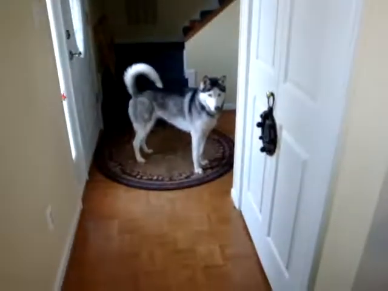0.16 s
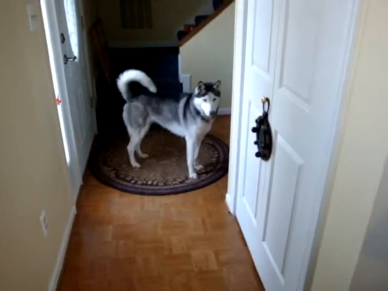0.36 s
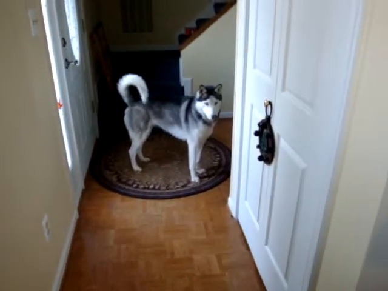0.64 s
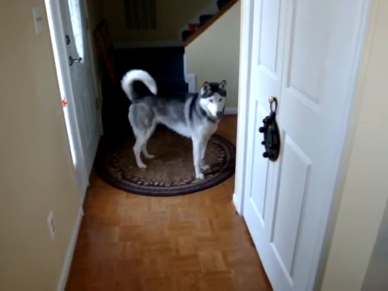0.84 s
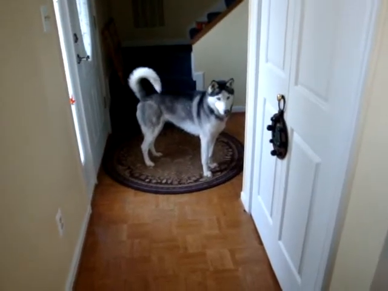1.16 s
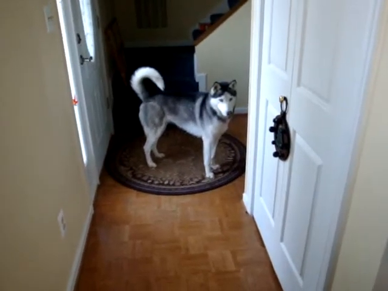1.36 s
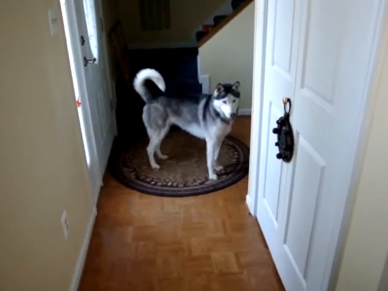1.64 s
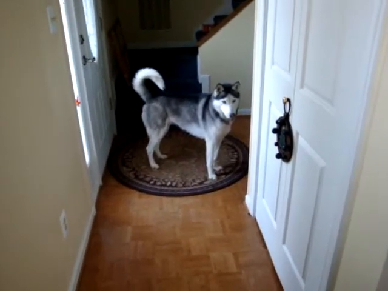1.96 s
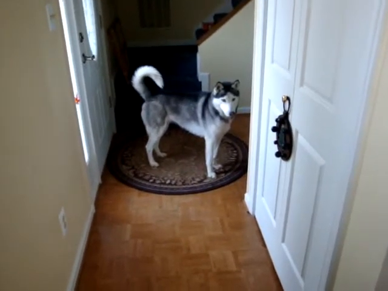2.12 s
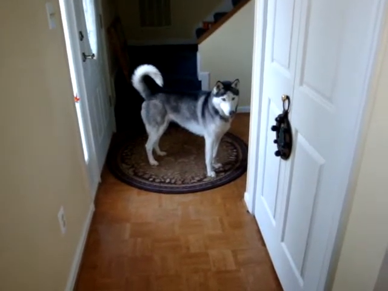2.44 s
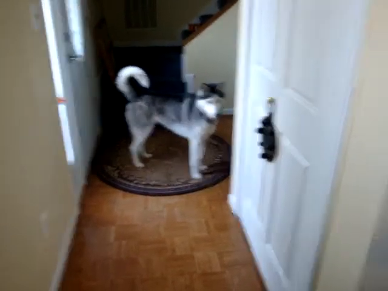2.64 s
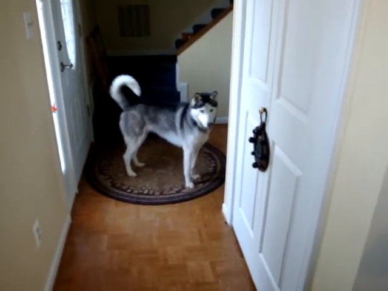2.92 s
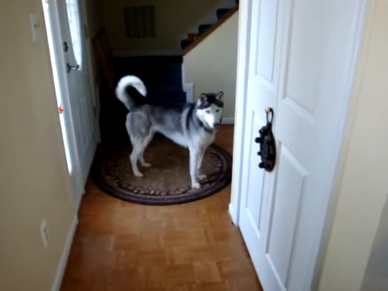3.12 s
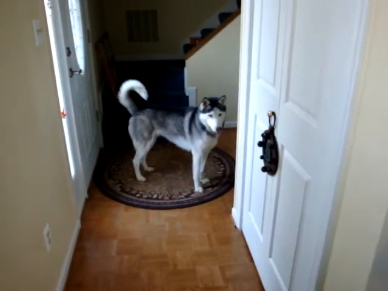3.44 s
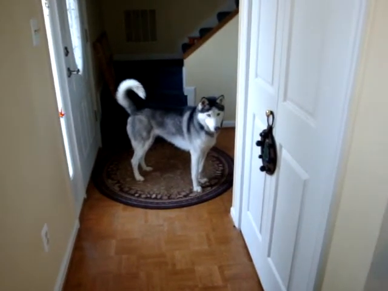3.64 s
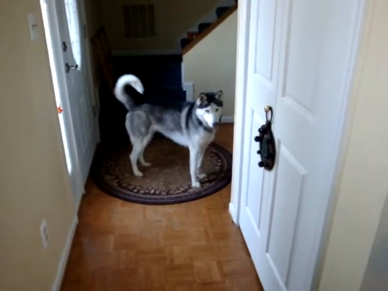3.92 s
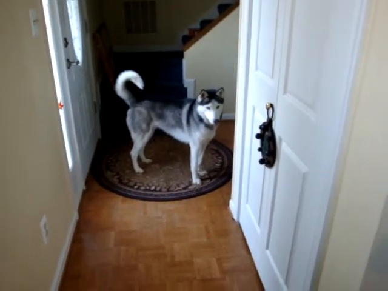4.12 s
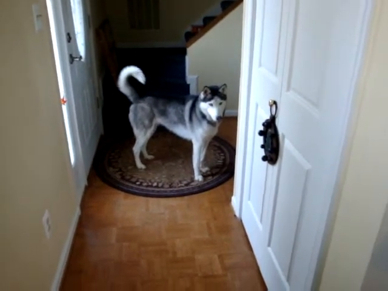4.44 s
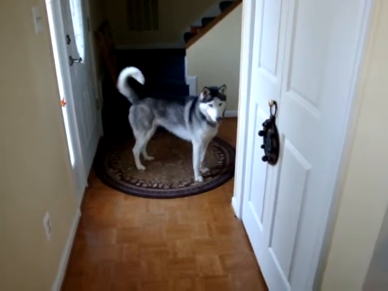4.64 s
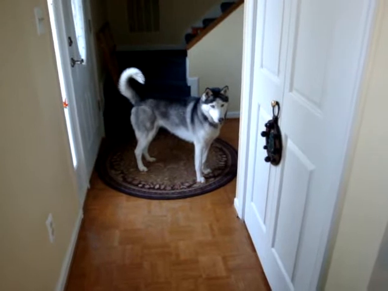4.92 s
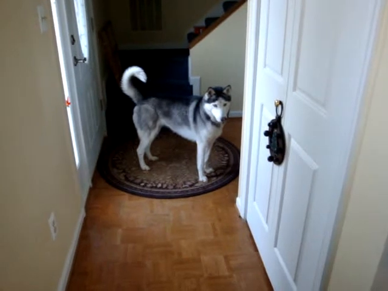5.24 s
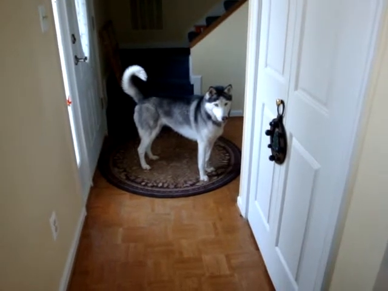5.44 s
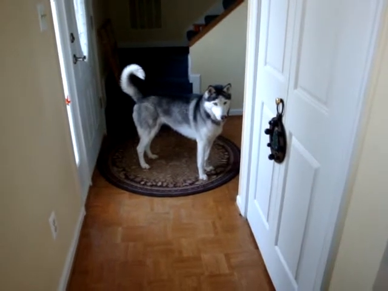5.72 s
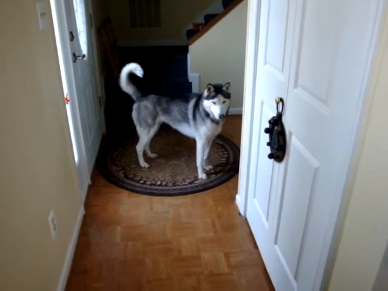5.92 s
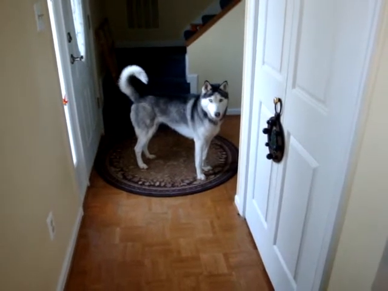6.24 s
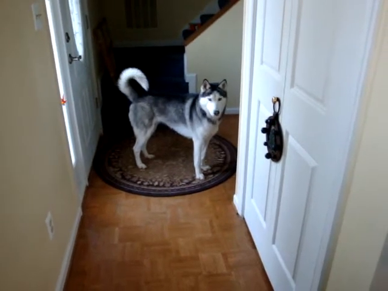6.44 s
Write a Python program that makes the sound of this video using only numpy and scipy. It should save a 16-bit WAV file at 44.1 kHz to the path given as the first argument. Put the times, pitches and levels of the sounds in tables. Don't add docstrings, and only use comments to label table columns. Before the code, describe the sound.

A hand squeezes a hollow rubber squeak toy very near a small camera microphone in a hard-floored hallway. Short whining squeaks alternate with slow climbs that break into shrill overblown notes and drop. A breath of air passes around two seconds; after four, two loud full presses swell and sink. A last squeak, airy puff and wobbling note end it over constant hiss.

```python
import sys
import numpy as np
from scipy import signal
from scipy.fft import rfft, irfft, next_fast_len
from scipy.io import wavfile
from scipy.ndimage import uniform_filter1d, minimum_filter1d

SR = 44100
rng = np.random.default_rng(int(sys.argv[2]) if len(sys.argv) > 2 else 0)


def put_to_file(sound):
    columns = np.atleast_2d(sound).T
    safe = np.clip(columns, -1, 1)
    whole_steps = np.round(safe * 32767)
    wavfile.write(sys.argv[1], SR, whole_steps.astype(np.int16))


def attenuation_scalar(level_db):
    decades = np.asarray(level_db, float) / 20
    return 10 ** decades


N = 290178

# (start [s], end [s], rest pitch [Hz], level [dB], jet [dB])
FLICKS = [
    (0.105, 0.231, 1099, -29, -52.5),
    (1.294, 1.419, 1112, -28.5, -51),
    (2.431, 2.514, 1112, -29.5, -51.5),
    (3.179, 3.236, 1116, -28.5, -50),
    (5.613, 5.676, 1089, -27, -45),
]
FLICK_TOP_HZ, FLICK_RUN_S, FLICK_RISE_DB, FLICK_GROW_S = 3357, .015, 9, .026
SCOOP, SCOOP_DB, SCOOP_S = .1, -14, .006
# (time [s], reed [Hz], level [dB])
CLIMBS = [
    [],
    [(.49, 1396, -25), (.505, 1724, -29), (.54, 1768, -18), (.58, 1906, -20.5), (.63, 1917, -22.5),
     (.68, 1992, -21), (.705, 2173, -13.5), (.715, 3643, -34), (.725, 4595, -38.5)],
    [(2.768, 1293, -32.5), (2.785, 1325, -39), (2.8, 1566, -24), (2.84, 1694, -19.5), (2.885, 1856, -24),
     (2.909, 2420, -15), (2.914, 4743, -30.5), (2.932, 4310, -28.5), (2.953, 4100, -38.5)],
    [(3.475, 1292, -33.5), (3.495, 1560, -27.5), (3.51, 1885, -15.5), (3.535, 1985, -23),
     (3.565, 2125, -20.5), (3.583, 2267, -14), (3.596, 3493, -22.5), (3.602, 6260, -51), (3.64, 5586, -40)],
]
# (time from drop [s], reed [Hz], level [dB])
DROP_SHAPE = [(-.023, 3900, -21.5), (-.015, 3730, 2), (-.008, 3480, -8), (0, 3010, 3), (.007, 2507, -4.5),
              (.014, 2046, 2), (.036, 1682, -3.5), (.055, 1360, -8), (.074, 1170, -17)]
# (time [s], level [dB], jet [dB], pop at stroke start [1])
DROPS = [
    (.002, -21, -49, 0.0069),
    (.765, -23, -52, 0.9),
    (2.959, -21, -59, 2.2),
    (3.67, -19, -53, 1.5),
]
# (time [s], reed [Hz], level [dB])
SWELLS = [
    [(4.2, 1195, -29.5), (4.222, 1128, -36.5), (4.24, 1592, -20), (4.263, 2039, -26.5), (4.28, 2161, -10),
     (4.31, 2126, -15.5)],
    [(4.852, 1066, -30), (4.875, 1157, -33), (4.9, 1608, -20), (4.915, 1980, -23), (4.93, 2127, -8.5),
     (4.975, 2177, -13)],
]
# (time after release [s], share of pitch [1], level [dB])
SINK = [(0, 0.98, 0.5), (.022, .875, 2), (.043, .73, 0), (.07, .63, -13.5), (.093, .59, -9)]
# (time [s], reed [Hz], level [dB], jet [dB], jet change over the stroke [dB])
RELEASES = [
    (4.345, 2047, -22.5, -32, -12),
    (5.01, 2093, -22, -31, -14),
]
# (time [s], reed [Hz], level [dB])
WOBBLES = [
    [(.995, 1292, -31), (1.005, 1344, -27.5), (1.04, 1279, -33.5), (1.08, 1262, -35), (1.105, 1158, -38.5),
     (1.13, 1290, -71)],
    [(1.495, 1743, -34), (1.512, 2168, -18.5), (1.535, 1874, -21), (1.555, 1557, -25), (1.59, 1366, -29),
     (1.625, 1245, -36), (1.655, 1153, -35)],
    [(3.872, 1036, -30.5), (3.89, 1178, -25), (3.92, 1339, -27), (3.947, 1699, -17.5), (3.972, 1230, -32.5),
     (4.002, 1225, -21.5), (4.025, 1553, -25), (4.04, 1918, -23), (4.052, 3445, -27)],
    [(4.512, 1068, -24), (4.535, 1301, -27), (4.55, 1580, -22.5), (4.562, 1761, -10.5),
     (4.575, 1705, -24.5), (4.59, 1555, -18), (4.602, 1733, -40.5), (4.612, 2300, -14.5),
     (4.623, 3394, -25)],
    [(5.94, 1186, -36.5), (5.975, 1535, -21), (6.07, 1378, -24.5), (6.145, 1292, -28.5),
     (6.175, 1388, -24.5), (6.2, 1317, -24.5), (6.225, 1433, -24.5), (6.265, 1308, -35.5),
     (6.285, 1110, -31.5)],
]
# (jet [dB], jet change over the stroke [dB], pop at start [1])
WOBBLE_FLOW = [
    (-53, -7, 0.049),
    (-50.5, -7.5, .95),
    (-38.5, 8, 0.041),
    (-39.5, 5.5, 0.062),
    (-49, -8.5, 2.5),
]
# (overtones [dB], roll-off [dB per partial])
VOICES = [(0, -0.5), (0, -1.1), (2, -0.1), (2, -1.2), (1.5, 0.9), (1, -5.5), (-0.5, 0), (-0.5, -1.5),
          (-0.5, -1), (-3, -2.5), (-2.5, -1.7), (-4.5, -2.5), (0.6, -2), (-1, -2.4), (0.5, -1.7),
          (-2.5, 0.1)]
GLINT_DB = [0.5, 2.5, -1, -0.5, 2.5, -2.5, -0.5, 3.5, -1, 1.5, -4, -2.5, -1, 3, 4.5, 1]

# (start [s], end [s], half-line re first partial [dB])
DOUBLING = [
    (4.275, 4.35, -21),
    (4.93, 6.9, -34),
    (3.53, 3.58, -18.5),
]
# (reed [Hz], level [dB])
SECOND = [(1000, -14), (1120, -4), (1280, 4), (1550, -10), (1900, -11), (2150, -14), (3300, -11.5),
          (4500, -36)]
# (frequency [Hz], level [dB])
PARTIALS = [(1500, -12), (2500, 6.5), (3500, -2.5), (4500, -8), (6000, -5.5), (7500, -29.5), (9000, -27),
            (11000, -28)]
# (frequency [Hz], level [dB])
BEAM = [(3500, -35), (5500, -14), (7500, -5.5), (9500, 1.5), (12000, -11.5)]
# (frequency [Hz], share [0-1])
RASP = [(1500, .08), (3500, .2), (5500, .55), (9000, .8)]
# (frequency [Hz], width [Hz], level [dB])
BODY = [(1580, 230, 0.5), (2076, 240, 3), (3068, 250, 3.5), (3750, 190, 7.5), (4220, 320, 3.5)]
KICK_S, SAG, SAG_S, PUFF_DB = .003, .13, .013, -27

# (frequency [Hz], level [dB per Hz])
JET = [(600, -35), (1200, 1.5), (2500, 14), (4500, -1.5), (6000, -4.5), (7500, 5.5), (9000, 8),
       (11000, -12.5)]
# (reed [Hz], level [dB])
FLOW = [(1100, -2.5), (1500, 1), (2200, 3.5), (3300, 9), (4500, -7)]
# (reed [Hz], level [dB])
SHINE = [(1100, 3), (1500, 2.5), (2200, -2.5), (3400, -2)]
JET_POP_DB, JET_POP_S, JET_LAG_S = 9.5, .02, .0078
# (start [s], hold until [s], level [dB], fade [dB/s], share off the tube resonances [0-1])
AIR = [
    (0.205, 0.27, -46, 105, 0.3),
    (1.935, 2.12, -35.5, 496, 0.36),
    (5.855, 5.992, -34, 126, 0.8),
]
# (frequency [Hz], width [Hz], level [dB])
TUBE = [(2477, 11, 1), (3350, 140, -5.5), (4130, 6.7, 8.5), (4530, 30, 0.5), (5020, 12, -7.5),
        (7300, 19, -31.5)]

# (time [s], peak [dB], ring [Hz], crack re peak [dB], hallway send [dB])
KNOCKS = [
    (0.705, -39.5, 396, 11.5, 11),
    (2.907, -26.5, 420, 16, -3.5),
    (3.586, -35.5, 495, -18, -3.5),
    (3.745, -29, 840, 10.5, -10),
    (3.914, -32.5, 535, -4, -8.5),
    (4.24, -29.5, 740, -9, -4),
    (4.305, -39.5, 740, -16, -13),
    (4.554, -35.5, 690, -24, -12),
]
# (time [s], peak [dB])
WIND_PUFFS = [
    (3.587, -79),
    (4.047, -47.5),
    (4.305, -50),
    (4.379, -54),
    (4.93, -52),
    (4.981, -51),
]

# (frequency [Hz], time [s])
HALL_T60 = [(200, 0.47), (1000, 0.28), (3000, 0.34), (6000, 0.37), (10000, .25)]
# (delay [s], level [dB])
ECHOES = [
    (.0031, -11),
    (.0058, -17.5),
    (.0094, -12),
    (0.0134, -11.5),
]
# (frequency [Hz], level [dB per Hz])
HISS = [(18, -60), (30, -33.5), (218, -8), (253, -5), (279, -7), (467, -4), (554, -7), (841, -8.5),
        (1210, -8), (1750, -14), (1940, -14), (9760, -25.5), (10500, -32.5), (13600, -75), (22000, -120)]
# (frequency [Hz], level [dB])
ROUNDING = [(500, -18), (2500, -11), (4500, -1), (7000, 2.5), (10500, 2.5)]


def flick(start, end, rest_hz, db):
    t = np.linspace(start, end, num=60)
    scoop = np.exp((start - t) / SCOOP_S)
    run = np.exp((t - end) / FLICK_RUN_S)
    hz = rest_hz * (1 - SCOOP * scoop) * (FLICK_TOP_HZ / rest_hz) ** run
    level = db + SCOOP_DB * scoop + FLICK_RISE_DB * np.exp((t - end) / FLICK_GROW_S)
    return np.transpose([t, hz, level])


def placed(shape, s, hz, db):
    return [(s + a, hz * b, db + c) for a, b, c in shape]


def joined(first, then):
    return first + [row for row in then if not first or row[0] > first[-1][0]]


def strokes():
    all_strokes = []
    for start, end, hz, db, jet_db in FLICKS:
        all_strokes.append((flick(start, end, hz, db), jet_db, 6, .055))
    for climb, (s, db, jet_db, pop) in zip(CLIMBS, DROPS):
        all_strokes.append((joined(climb, placed(DROP_SHAPE, s, 1, db)), jet_db, -4.5, pop))
    for swell, (s, hz, db, jet_db, turn_db) in zip(SWELLS, RELEASES):
        all_strokes.append((joined(swell, placed(SINK, s, hz, db)), jet_db, turn_db, 1.6))
    for rows, flow in zip(WOBBLES, WOBBLE_FLOW):
        all_strokes.append((rows, *flow))
    return all_strokes


def reed(beam):
    tone = np.zeros(N)
    waver, flutter = walk(90), walk(160)
    puff = unit(band(band(rng.standard_normal(N), 950, 2800), 1000, 4500))
    grit = walk(260) / np.sqrt(2)
    t = np.arange(N) / SR
    half = sum(attenuation_scalar(db) * np.clip(np.minimum(t - a, b - t) / .0023, 0, 1) for a, b, db in DOUBLING)
    for (table, _, _, kick), (over_db, roll_db) in zip(strokes(), VOICES):
        i, fade, (hz, db) = stroke(table)
        second_db = on_log(SECOND, hz) + over_db
        age = (i - i[0]) / SR
        unrest = .002 * (1 + (hz / 2300) ** 4)
        start_bend = np.exp(-age / KICK_S) - SAG * np.exp(-age / SAG_S)
        hz = hz * (1 + kick * start_bend) * (1 + unrest * waver[i])
        collapse = np.clip(-np.gradient(np.log(hz)) * SR / 16, 0, 1) * (age > .02)
        collapse = uniform_filter1d(collapse, 200)
        second_db = second_db - 4.8 * collapse
        phase = 2 * np.pi * np.cumsum(hz) / SR
        gain = np.sqrt(2) * attenuation_scalar(db - 3.0)
        wave = gain * (np.sin(phase) + half[i] * (.5 * np.sin(phase / 2) + np.sin(3 * phase / 2)))
        for k in range(2, 11):
            colour_db = on_log(PARTIALS, k * hz) - on_log(PARTIALS, 2 * hz)
            odd_db = -1.5 * (k % 2)
            body = gain * attenuation_scalar(second_db + odd_db + roll_db * (k - 2.5) + colour_db)
            top = beam[i] * np.sqrt(hz / 1500) * attenuation_scalar(on_log(BEAM, k * hz))
            rasp = on_log(RASP, k * hz) * np.clip(hz / 1800, .4, 1)
            rasp = np.minimum(rasp + .65 * collapse, .95)
            clean = np.sqrt(1 - rasp ** 2)
            sway = np.roll(grit, 5000 * k)[i]
            shake = np.roll(grit, 7000 * k + 900)[i]
            angle = k * phase + k * k
            ring = (clean + rasp * sway) * np.sin(angle) + rasp * shake * np.cos(angle)
            wave += (body + top) * (k * hz < .3 * SR) * ring
        flutter_db = .6 + 5 * collapse + 4 * np.clip(hz / 1000 - 2.4, 0, 1)
        wave *= attenuation_scalar(flutter_db * flutter[i])
        tone[i] += fade * (wave + kick * attenuation_scalar(PUFF_DB) * np.exp(-age / .011) * puff[i])
    return tone


def hollow(x):
    rings = sum(attenuation_scalar(db) * signal.lfilter(*signal.iirpeak(hz, hz / width, SR), x) for hz, width, db in BODY)
    return attenuation_scalar(-5.0) * (x + rings)


def jet_level():
    jet, beam = np.zeros(N), np.zeros(N)
    for (table, db, turn_db, pop), glint_db in zip(strokes(), GLINT_DB):
        i, fade, (hz, _) = stroke([*table, (table[-1][0] + JET_LAG_S, *table[-1][1:])])
        burst_db = JET_POP_DB * min(pop, 1) * np.exp((i[0] - i) / SR / JET_POP_S)
        jet[i] = fade * attenuation_scalar(db + np.linspace(0, turn_db, len(i)) + on_log(FLOW, hz) + burst_db)
        beam[i] = jet[i] * attenuation_scalar(on_log(SHINE, hz) + glint_db - burst_db)
    return jet, beam


def nozzle(jet):
    rush = coloured(lambda hz: attenuation_scalar(on_log(JET, hz)))
    dull = signal.sosfiltfilt(signal.butter(2, 5000, fs=SR, output="sos"), rush)
    flicker = attenuation_scalar(-3.0 + 2.1 * walk(52))
    return jet * flicker * (rush - dull + dull / (1 + jet / attenuation_scalar(-41)))


def tube_gain(hz):
    power = sum(attenuation_scalar(db) ** 2 / (1 + ((hz - f) / (1.7 * w)) ** 2) for f, w, db in TUBE)
    return np.sqrt(power) * hz ** 2 / (hz ** 2 + 1900 ** 2)


def air():
    tube = coloured(tube_gain)
    edge = unit(band(rng.standard_normal(N), 5800, 9200))
    broad = unit(band(band(rng.standard_normal(N), 1700, 6200), 2200, 6200))
    out = np.zeros(N)
    for s, until, top_db, fade_db_s, share in AIR:
        swell = [(s, top_db - 10), (s + .05, top_db), (until, top_db), (until + .19, top_db - .21 * fade_db_s)]
        i, fade, (db,) = stroke(swell, fade_s=.0098)
        breath = np.sqrt(1 - min(share, 1) ** 2) * tube[i] + share * broad[i] + attenuation_scalar(-16) * edge[i]
        out[i] = fade * attenuation_scalar(db) * breath
    return out


def knocks():
    near, send = np.zeros(N), np.zeros(N)
    t = np.arange(int(.03 * SR)) / SR
    cracks = band(rng.standard_normal((len(KNOCKS), len(t))), 320, 5000)
    for (s, db, hz, crack_db, hall_db), crack in zip(KNOCKS, cracks):
        swing = np.sin(2 * np.pi * hz * t) * np.exp(-t * hz / .7)
        pop = attenuation_scalar(db) * (-3 * swing + attenuation_scalar(crack_db) * crack * np.exp(-t / .0036))
        i = int(s * SR)
        near[i:i + len(t)] += pop
        send[i:i + len(t)] += attenuation_scalar(hall_db) * pop
    return band(near, 170, 13000), band(send, 140, 3900)


def wind_puffs():
    out = np.zeros(N)
    bump = np.hanning(int(.0048 * SR))
    for s, db in WIND_PUFFS:
        i = int(s * SR)
        out[i:i + len(bump)] += attenuation_scalar(db + 6.0) * bump
    return band(out, 22, 300)


def hallway(x):
    t = np.arange(int(.6 * SR)) / SR
    tail = np.zeros(len(t))
    for hz in 110 * 2 ** np.arange(0, 7, .5):
        part = unit(band(rng.standard_normal(len(t)), hz / 2 ** .25, hz * 2 ** .25))
        tail += np.sqrt(hz) * part * np.exp(-np.log(1000) * t / on_log(HALL_T60, hz))
    tail *= np.clip(t / .0023, 0, 1)
    tail *= attenuation_scalar(-5) / np.sqrt(np.sum(tail ** 2))
    for s, db in ECHOES:
        tail[int(s * SR)] += attenuation_scalar(db)
    return signal.fftconvolve(x, tail)[:N]


def camera_hiss():
    return attenuation_scalar(-53) * coloured(lambda hz: attenuation_scalar(on_log(HISS, hz)))


def on_log(table, hz):
    f, v = np.transpose(table)
    return np.interp(np.log(np.maximum(hz, 1)), np.log(f), v)


def unit(x):
    return x / np.sqrt(np.mean(x ** 2))


def coloured(gain):
    size = next_fast_len(N)
    hz = np.arange(size // 2 + 1) * SR / size
    return unit(irfft(rfft(rng.standard_normal(size)) * gain(hz), size)[:N])


def walk(rate):
    return coloured(lambda hz: 1 / (1 + (hz / rate) ** 4))


def band(x, lo_hz, hi_hz):
    return signal.sosfilt(signal.butter(2, [lo_hz, hi_hz], "bandpass", fs=SR, output="sos"), x)


def stroke(table, fade_s=.0027):
    s, *columns = np.transpose(table)
    i = np.arange(max(int(s[0] * SR), 0), min(int(s[-1] * SR), N))
    t = i / SR
    fade = np.clip(np.minimum(t - s[0] + (s[0] <= 0), s[-1] - t) / fade_s, 0, 1)
    return i, fade, [np.interp(t, s, c) for c in columns]


def scene():
    jet, beam = jet_level()
    toy = hollow(reed(beam)) + nozzle(jet) + air()
    near, send = knocks()
    return (toy + near + wind_puffs() + hallway(toy + send) + camera_hiss())[None]


def limiter(x, top_db=-9, hold_s=.003):
    size = int(hold_s * SR)
    peak = uniform_filter1d(-minimum_filter1d(-np.abs(x), size), size)
    return x * np.minimum(1, attenuation_scalar(top_db) / (peak + 1e-9)) ** .7


def coarse_rounding(x, size=256, group=8):
    n, k = np.arange(2 * size), np.arange(size // 2)
    window = np.sqrt(2 / size) * np.sin(np.pi * (n + .5) / (2 * size))
    basis = window * np.cos(np.pi / size * np.outer(k + .5, n + .5 + size / 2))
    count = N // size + 2
    padded = np.pad(x, (size, (count + 1) * size - N - size))
    lines = np.lib.stride_tricks.sliding_window_view(padded, 2 * size)[::size] @ basis.T
    power = np.mean(lines.reshape(len(lines), -1, group) ** 2, axis=2) + 1e-18
    loud_db = 10 * np.log10(power.mean(axis=1))
    attack_db = np.clip(.3 * (np.roll(loud_db, -3) - loud_db), 0, 7)
    need_db = .12 * (loud_db + 50) + attack_db
    luck_db = 4 * rng.standard_normal(power.shape)
    step = np.repeat(np.sqrt(power) * attenuation_scalar(need_db[:, None] + luck_db), group, axis=1)
    step = step * attenuation_scalar(on_log(ROUNDING, k * SR / (2 * size)))
    frames = (np.round(lines / step) * step) @ basis
    out = np.zeros((len(lines) + 1, size))
    out[:-1] += frames[:, :size]
    out[1:] += frames[:, size:]
    return out.ravel()[size:size + N]


def top_cut(x):
    return signal.sosfilt(signal.butter(12, 10790, fs=SR, output="sos"), x)


def record(dry):
    rounded = coarse_rounding(limiter(dry[0]))
    low_pass = signal.ellip(10, .3, 80, 9950, fs=SR, output="sos")
    narrow = signal.sosfilt(low_pass, rounded)
    return top_cut(narrow[None])


dry = scene()
out = record(dry)
put_to_file(out)
```